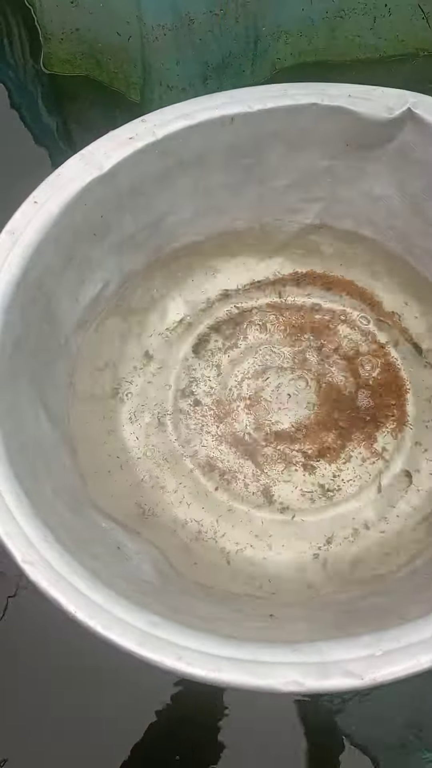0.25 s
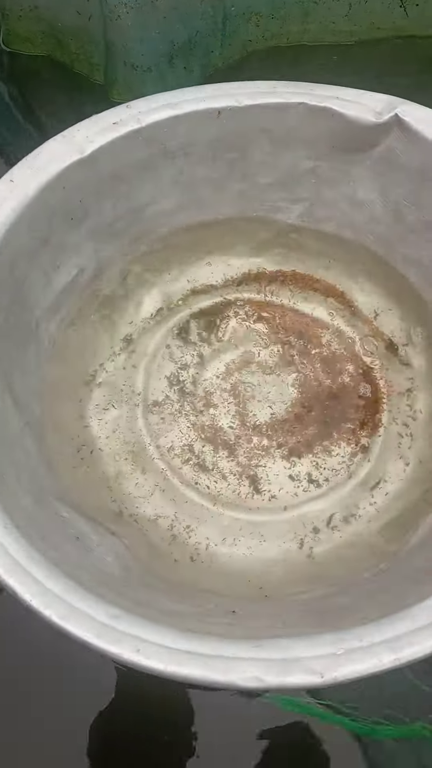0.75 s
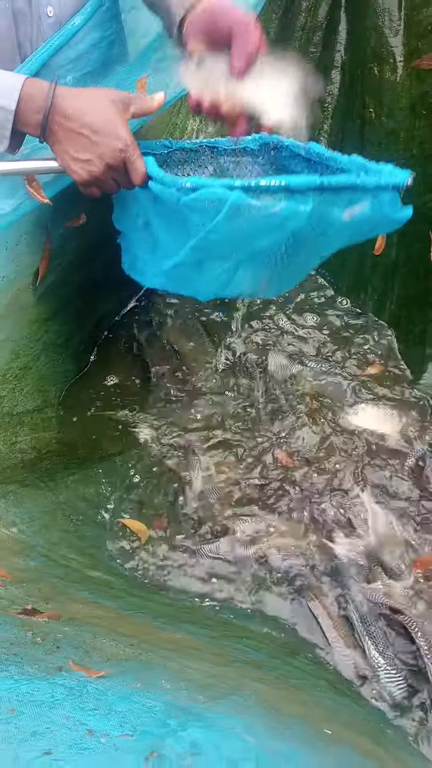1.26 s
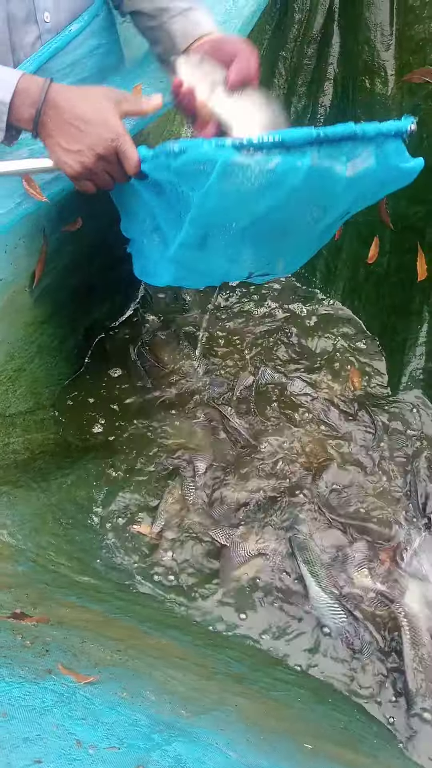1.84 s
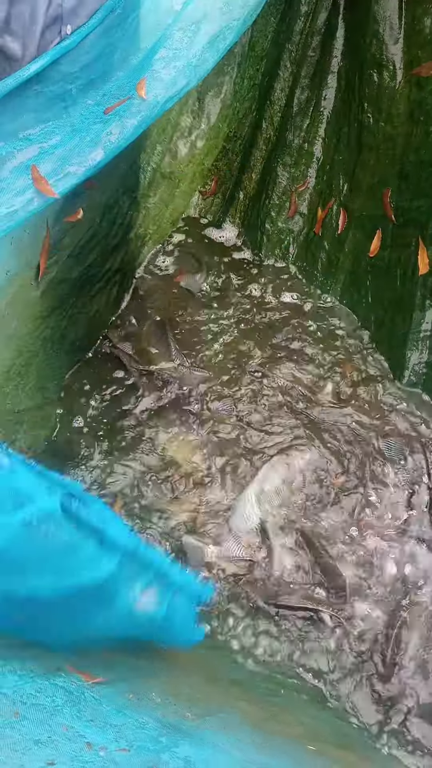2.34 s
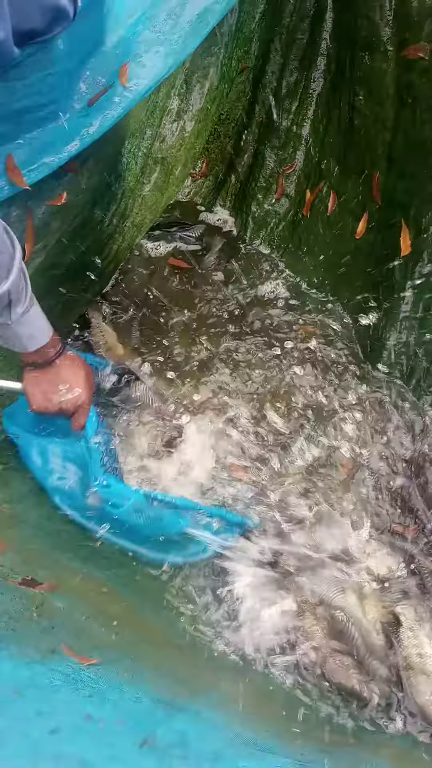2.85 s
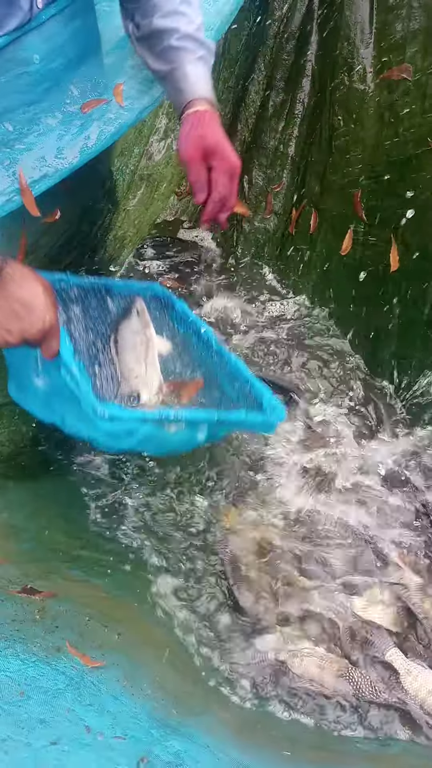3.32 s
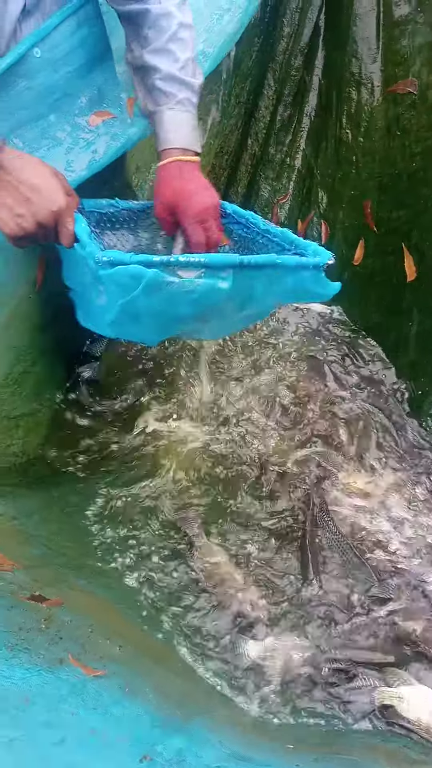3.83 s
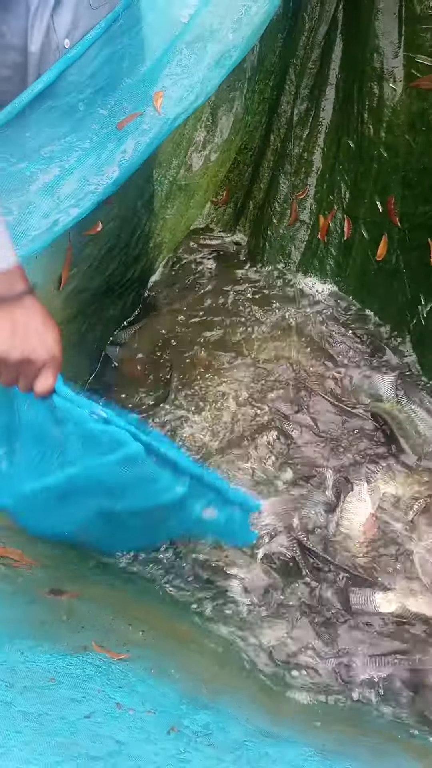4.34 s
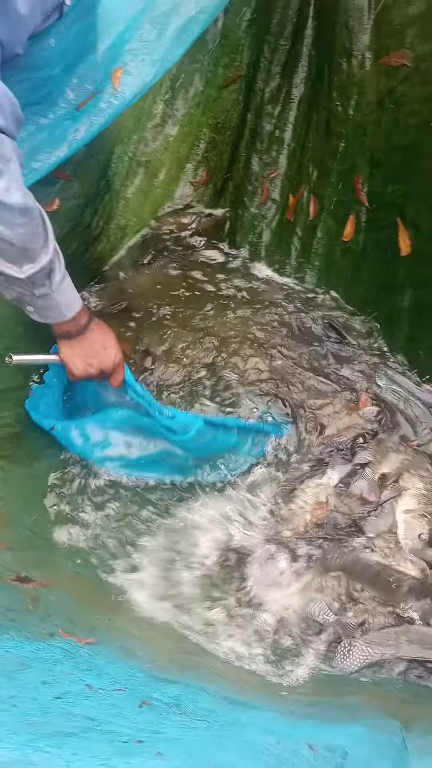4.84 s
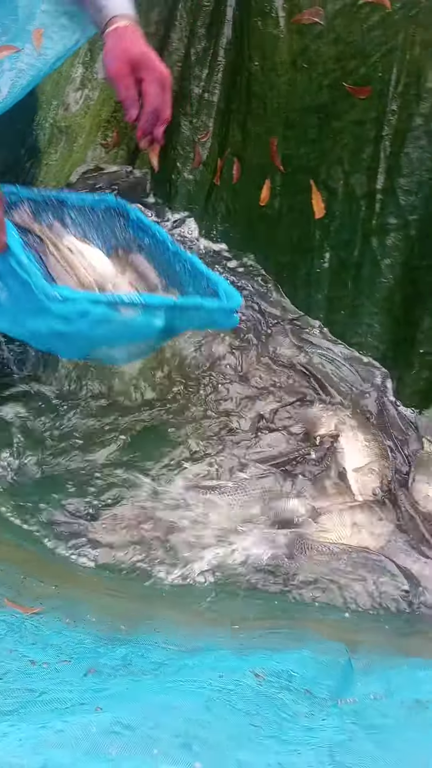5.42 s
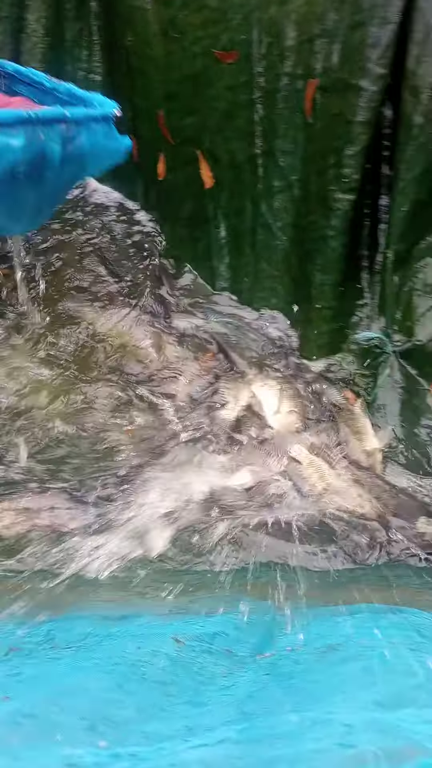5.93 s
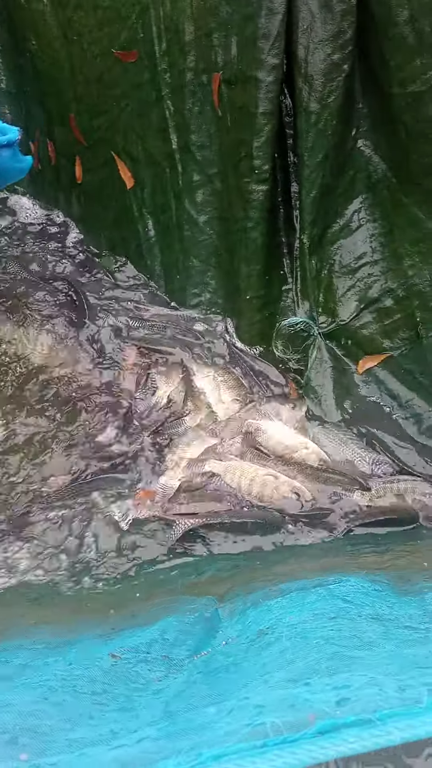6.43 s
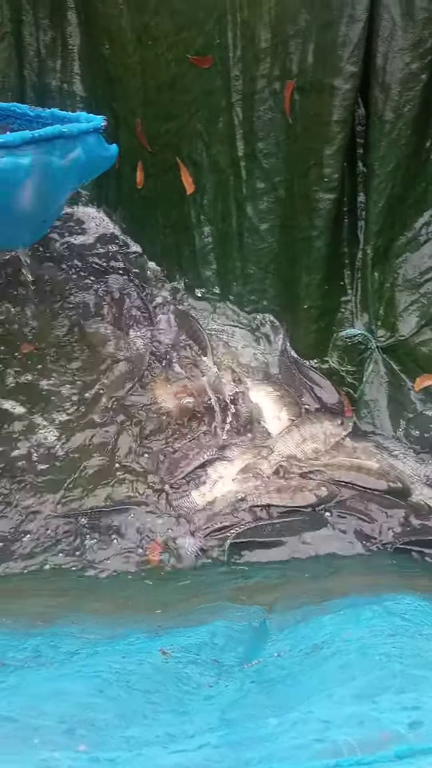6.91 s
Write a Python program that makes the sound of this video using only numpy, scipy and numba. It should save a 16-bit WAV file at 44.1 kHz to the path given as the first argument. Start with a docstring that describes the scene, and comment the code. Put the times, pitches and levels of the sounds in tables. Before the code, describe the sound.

Quiet watery churning with ringing plops and soft thuds swells into loud, bubbling fish thrashing with sharp tail slaps, then eases.

```python
"""Crowded fish thrash in a shallow lined pond while a hand net is swept through them.
It starts with quiet churning, a few ringing plops and soft thuds of bodies on the liner. From about 1.8 s
tails slap the surface, and from 2.6 s swarms of bubbles and droplets ring loudly over a wash of noise.
After the last slap at 6.5 s the churning goes on easing. Bubbles, plops, droplets and thuds are decaying tones;
slaps, spray and wash are shaped noise. A small microphone with little bass and treble listens from above."""
import sys
import numpy as np
from scipy import signal
from scipy.io import wavfile
from numba import njit

SR = 44100
rng = np.random.default_rng(int(sys.argv[2]) if len(sys.argv) > 2 else 0)


def generate_wav(sig):
    """Save sig (samples, or channels by samples) to the path in sys.argv[1] as 16-bit PCM at SR."""
    pcm = np.round(np.clip(np.atleast_2d(sig).T, -1, 1) * 32767).astype(np.int16)
    wavfile.write(sys.argv[1], SR, pcm)


N = 316197   # length in samples, about 7.17 s

# Low heaving of the water. Each row: time in seconds, level in dB.
HEAVING = [(0.0, -74.5), (1.88, -65.5), (1.92, -58), (2.21, -73), (2.35, -53), (2.5, -65), (2.62, -46.5),
           (3.05, -67), (3.33, -50.5), (3.43, -68), (3.67, -61), (3.81, -72.5), (4.55, -73.5),
           (4.59, -60.5), (4.63, -69), (4.83, -55), (5.69, -80), (5.79, -57), (5.91, -66.5), (7.17, -63.5)]
# Tone colour of the heaving. Each row: pitch in Hz, relative level in dB per Hz.
RUMBLE_COLOUR = [(24, -49), (40, -27.5), (81, 0), (124, -7.5), (199, -4.5), (260, -12.5), (340, -30),
                 (570, -120)]
DEEP_HZ, DEEP_SHARE = 107, 0.27   # below this pitch the rumble takes only a share of the heaving's swing

# Steady churning. Each row: time in seconds, splash level in dB, gurgle level in dB, spray level in dB.
# Of gurgle and spray, only the swing against the splash is used, not the average.
CHURNING = [(0.0, -45, -51.5, -64.5), (0.9, -47.5, -51.5, -61), (0.94, -45.5, -48.5, -58.5),
            (1.18, -42, -46, -53.5), (1.6, -42, -45, -55.5), (2.46, -39.5, -46, -52), (2.62, -37, -45, -50),
            (2.81, -33.5, -41.5, -45.5), (3.11, -34.5, -46, -48), (3.57, -33.5, -43, -48),
            (3.771, -36.5, -47.5, -48), (3.99, -38.5, -46.5, -52.5), (4.25, -35.5, -48.5, -51.5),
            (4.489, -35, -46.5, -51.5), (4.89, -33, -41.5, -46), (5.17, -34.5, -45.5, -52.5),
            (5.41, -35.5, -47.5, -52.5), (5.75, -34.5, -46.5, -48), (6.07, -37.5, -43, -52.5),
            (6.35, -40.5, -46.5, -51), (6.8, -41.5, -43.5, -52.5), (7.17, -44.5, -44, -56)]
GURGLE_HZ, SPLASH_HZ, SPRAY_HZ = 685, 1880, 4800   # where each churning level rules
# Bouts of thrashing on top of it. Each row: start in seconds, length in seconds, splash level in dB
# halfway through, share of the lift that the gurgle takes from 0 to 1.
THRASHING_BOUTS = [(0.658, 0.028, -42, 0.7), (0.999, 0.33, -44.5, 0.6), (1.628, 0.055, -43.5, 0.2),
                   (1.845, 0.019, -49.5, 0.3), (1.952, 0.02, -38, 0), (2.603, 0.19, -31, 0.4),
                   (2.818, 0.028, -37, 0.4), (2.961, 0.043, -32.5, 1), (3.348, 0.048, -34.5, 0.99),
                   (4.008, 0.015, -37.5, 0.4), (4.183, 0.022, -42, 0.4), (4.301, 0.049, -29.5, 0.6),
                   (4.391, 0.05, -28.5, 1), (4.465, 0.03, -25.5, 0.4), (4.584, 0.075, -31.5, 0.7),
                   (4.922, 0.025, -31.5, 0.5), (5.457, 0.035, -35.5, 0.4), (5.737, 0.047, -30.5, 0.6),
                   (5.82, 0.027, -32, 0.4), (5.9, 0.068, -31, 0), (6.073, 0.096, -35, 0.8),
                   (6.508, 0.017, -44.5, 0.5), (6.707, 0.022, -49, 0.4), (6.93, 0.086, -42.5, 0.8)]
BOUT_ATTACK_S, BOUT_RELEASE_S = 0.0049, 0.044
BOUT_SAG_DB = 4.5   # fall in level from start to end of a bout
SPRAY_SHARE = 0.86   # share of a bout's lift in the spray
# Tone colour of the water. Each row: pitch in Hz, relative level in dB per Hz.
WATER_COLOUR = [(150, -62), (250, -12.5), (417, 0.5), (592, -6), (770, -2.5), (1140, -3), (1500, -3.5),
                (2870, -6), (3620, -6), (4500, -12.5), (5140, -21), (6550, -15), (7100, -18.5),
                (8400, -13.5)]
# Resonances of the lined pit. Each row: pitch in Hz, width in Hz, lift in dB.
PIT_RESONANCES = [(87.5, 7.6, 2.5), (413, 18, 3), (682, 110, 5.5), (787, 15, 9), (1056, 49, 3.5),
                  (1410, 440, 4), (1406, 70, 0.5)]
PIT_T60_S, PIT_DB = 0.13, -9.5   # scatter from the pit walls: time to decay by 60 dB, and level

# Thuds on the liner. Each row: start in seconds, peak in dB, pitch in Hz.
LINER_THUDS = [(0.212, -50, 95), (0.774, -53, 148), (1.638, -50, 94.2), (1.891, -46, 89),
               (1.958, -49, 89.5), (2.325, -44, 158), (2.579, -40.5, 124), (2.793, -46, 98),
               (3.3, -42, 230), (3.64, -52, 145), (4.411, -50, 190), (4.58, -37, 122), (4.796, -43, 153),
               (5.028, -31, 290), (5.772, -36, 264), (6.034, -48, 155), (6.605, -53, 157)]
# Flicks of fine spray. Each row: start in seconds, approximate peak in dB.
SPRAY_FLICKS = [(0.1565, -45), (1.4605, -33), (1.5943, -44), (1.841, -30), (1.933, -45), (2.2558, -39),
                (2.272, -29), (2.4493, -51), (2.5955, -34), (2.6329, -30), (2.7232, -30), (2.838, -35),
                (2.9357, -30), (2.9796, -31), (3.0065, -24.5), (3.0629, -30), (3.0854, -47), (3.283, -28),
                (3.3837, -42), (3.4341, -42), (3.451, -24), (3.5379, -29), (3.64, -32), (3.7342, -31),
                (3.905, -41), (3.936, -33), (4.0178, -38), (4.1, -35), (4.2368, -35), (4.2991, -31.5),
                (4.3171, -29), (4.376, -29), (4.4189, -29), (4.5052, -28), (4.5825, -31), (4.6565, -28),
                (4.734, -36), (4.8678, -40), (4.9856, -29.5), (5.1596, -34), (5.227, -33), (5.461, -32),
                (5.561, -32), (5.6022, -36), (5.6281, -29), (5.7425, -21.5), (5.88, -33), (6.0362, -35),
                (6.0778, -31), (6.133, -29.5), (6.324, -35), (6.4438, -39), (6.4883, -34), (6.5331, -53),
                (6.654, -36), (6.6897, -43), (6.7261, -37), (6.8138, -34.5), (7.0663, -38), (7.1072, -40)]
# Flat slaps of tails on the surface. Each row: start in seconds, level in dB before SLAP_DB is added,
# fading time in milliseconds.
TAIL_SLAPS = [(1.846, -26, 7.6), (2.598, -51, 3.5), (2.934, -22, 8.7), (3.062, -26, 2), (3.449, -20, 1.2),
              (4.591, -22, 4.1), (5.226, -20, 3.8), (5.775, -16, 4.9), (6.153, -19, 2.1),
              (6.323, -18.5, 3.9), (6.529, -13, 4.2)]
# Small droplets falling back. Each row: start in seconds, peak in dB, pitch in Hz.
FALLING_DROPLETS = [(0.0587, -40, 3320), (0.9621, -35, 3110), (1.044, -35, 2380), (1.142, -29, 2380),
                    (1.841, -30, 3140), (2.597, -27, 2420), (2.6329, -35, 2670), (2.659, -24, 2350),
                    (2.7223, -31, 2520), (2.935, -25, 3250), (3.0126, -25, 3870), (3.019, -22, 3640),
                    (3.4504, -24.5, 3430), (3.602, -28, 3900), (3.659, -44, 3530), (3.783, -27.5, 3460),
                    (3.81, -36, 4000), (3.9047, -29.5, 4600), (3.944, -28.5, 2500), (3.981, -32, 3800),
                    (4.0177, -27, 2480), (4.191, -22.5, 3060), (4.516, -18, 3440), (4.565, -26, 3070),
                    (4.5854, -21, 3440), (4.656, -24, 3640), (4.754, -24, 3770), (4.812, -25.5, 2360),
                    (4.9201, -25.5, 2600), (4.984, -28, 3160), (4.991, -27, 2700), (5.161, -29, 4220),
                    (5.1845, -32, 3480), (5.224, -36, 2650), (5.367, -35, 3340), (5.397, -30, 3600),
                    (5.4543, -26, 2460), (5.629, -28, 2470), (5.7732, -28, 3060), (6.038, -29.5, 2400),
                    (6.106, -36, 3900), (6.142, -30, 2350), (6.1576, -20, 2600), (6.2096, -29, 2400),
                    (6.3251, -32, 4570), (6.53, -27, 4060), (6.619, -36, 2440), (6.694, -33, 2530),
                    (6.7088, -28, 2460), (6.728, -35, 2820)]
# Single plops. Each row: time in seconds one cycle after the start, peak in dB, pitch in Hz,
# cycles to die away by 60 dB (held between 5 and 80 when played).
SINGLE_PLOPS = [(0.148, -39, 794, 90), (0.578, -38.5, 1080, 29), (0.669, -34, 1570, 29),
                (0.927, -42, 1470, 20), (1.009, -34, 407, 19), (1.016, -30, 1380, 20),
                (1.041, -34, 418, 16), (1.069, -36, 423, 31), (1.136, -31, 1290, 30), (1.138, -36, 664, 42),
                (1.153, -33, 1670, 27), (1.215, -34, 688, 51), (1.232, -34.5, 410, 14),
                (1.383, -34.5, 485, 14), (1.417, -31, 1246, 29), (1.506, -35, 1090, 25),
                (1.595, -30.5, 1170, 31), (1.629, -31, 1270, 83), (1.751, -32, 1130, 25),
                (1.838, -28, 1620, 45), (1.964, -30, 1100, 19), (2.027, -40, 700, 28),
                (2.088, -36, 1270, 25), (2.254, -31, 673, 11), (2.333, -30.5, 338, 6.7),
                (2.507, -31.5, 1530, 34), (2.596, -30, 1680, 27), (2.616, -26, 1830, 24),
                (2.64, -28, 850, 28), (2.662, -19.5, 1270, 49), (2.665, -22, 1510, 28),
                (2.675, -21, 2150, 25), (2.687, -22, 1950, 22), (2.709, -22, 1530, 31),
                (2.718, -25, 1720, 22), (2.728, -24, 1500, 18), (2.777, -26, 1520, 18),
                (2.789, -27, 1800, 12), (2.811, -27, 1780, 28), (2.838, -28, 1500, 25),
                (2.849, -25, 1220, 17), (2.866, -24, 1700, 18), (2.912, -35.5, 745, 31),
                (2.971, -27, 1510, 31), (3.007, -25.5, 1300, 39), (3.062, -26.5, 1480, 28),
                (3.211, -29.5, 1340, 19), (3.246, -28.5, 346, 6.6), (3.276, -30, 1390, 14),
                (3.312, -24, 1320, 11), (3.349, -19.5, 1420, 45), (3.383, -23, 1560, 24),
                (3.428, -32.5, 397, 13), (3.478, -30, 1360, 25), (3.526, -29.5, 716, 30),
                (3.595, -29.5, 1970, 30), (3.702, -30, 1260, 29), (3.809, -30, 1390, 20),
                (3.862, -32.5, 1280, 33), (3.89, -29, 1310, 26), (3.936, -29, 1370, 22),
                (4.023, -17.5, 1810, 14), (4.189, -28, 2040, 26), (4.216, -26, 1025, 31),
                (4.274, -35, 830, 45), (4.315, -35, 1870, 15), (4.337, -24.5, 1630, 55),
                (4.397, -25, 1560, 37), (4.414, -26, 1490, 35), (4.43, -32, 1400, 25),
                (4.458, -30, 873, 36), (4.499, -17, 1440, 17), (4.528, -27, 795, 25),
                (4.529, -18.5, 1830, 17), (4.564, -17.5, 1620, 20), (4.589, -16.5, 2360, 21),
                (4.625, -22.5, 1373, 66), (4.76, -27, 1720, 57), (4.787, -27.5, 1610, 40),
                (4.808, -28, 970, 26), (4.889, -32, 1700, 24), (4.917, -25, 1530, 31),
                (4.974, -29.5, 746, 23), (4.988, -25.5, 1550, 28), (5.028, -24, 890, 9.9),
                (5.049, -29.5, 640, 20), (5.049, -32, 420, 16), (5.072, -28, 794, 22),
                (5.074, -26.5, 2000, 25), (5.146, -31, 1610, 24), (5.168, -27.5, 1530, 24),
                (5.224, -23.5, 1720, 20), (5.398, -27.5, 944, 30), (5.462, -24.5, 1820, 37),
                (5.628, -25, 1050, 26), (5.776, -23, 2080, 24), (5.817, -24, 2170, 30),
                (5.846, -23, 1590, 19), (5.88, -30, 1060, 17), (5.902, -24, 910, 20),
                (5.929, -28, 1900, 16), (5.96, -26, 1580, 42), (6.082, -31, 1680, 20),
                (6.088, -26, 1360, 35), (6.112, -29, 2070, 16), (6.124, -26, 2200, 22),
                (6.153, -20, 1920, 26), (6.162, -25, 2120, 23), (6.189, -26, 2170, 21),
                (6.223, -26, 2200, 30), (6.324, -31.5, 753, 41), (6.397, -34.5, 770, 25),
                (6.51, -28.5, 456, 12), (6.52, -31, 1200, 22), (6.529, -32.5, 780, 25),
                (6.531, -32.5, 416, 23), (6.61, -31, 430, 13), (6.698, -37, 743, 36), (6.713, -47, 390, 44),
                (6.75, -35, 810, 30), (6.918, -33, 640, 33), (6.948, -46, 550, 20)]

BUBBLES_DB, WASH_DB, SLAP_DB = -3, -5.5, -8.0   # layer levels
BASS_CUT_HZ, TREBLE_CUT_HZ, CUTOFF_HZ = 58, 7016, 8600   # microphone limits, then the steep top cut
HISS_DB = -102


def from_db(db):
    """Turn decibels into a gain."""
    return 10 ** (np.asarray(db) / 20)


def rms_one(x):
    """Scale a sound so that its average strength (rms) is 1."""
    return x / np.sqrt(np.mean(x ** 2) + 1e-20)


def at_hz(points, hz):
    """Read a tone colour at a pitch, on a log-frequency axis."""
    return np.interp(np.log(hz), np.log(np.array(points)[:, 0]), np.array(points)[:, 1])


def to_samples(s):
    """Turn seconds into whole sample positions."""
    return np.round(s * SR).astype(np.int64)


def noise_band(low_hz, high_hz, order):
    """White noise keeps only the pitches between two limits."""
    band = signal.butter(order, [low_hz, high_hz], "band", fs=SR, output="sos")
    return signal.sosfilt(band, rng.standard_normal(N))


def fading_puffs(start, height, fading_s):
    """Each start jumps to its height and fades exponentially."""
    puffs = np.zeros(N)
    puffs[start] = height
    return signal.lfilter([1], [1, -np.exp(-1 / (fading_s * SR))], puffs)


def drift(rate_hz):
    """Slow random wandering: noise at every 40th sample through two one-pole low-passes; rms 1."""
    r = np.exp(-80 * np.pi * rate_hz / SR)
    coarse = rng.standard_normal(N // 40 + 2002)
    slow = signal.lfilter([1], [1, -2 * r, r * r], coarse)[2000:]   # skip the filter's settling
    return np.interp(np.arange(N) / 40, np.arange(len(slow)), rms_one(slow))


@njit
def ring(start, hz, height, cycles, rise, swell, length, rate):
    """Each tone swells for some cycles, then dies by 60 dB in its cycles; a positive rise lifts its pitch."""
    out = np.zeros(length)
    for k in range(len(start)):
        lasting = int((cycles[k] + swell) * rate / hz[k])
        for i in range(min(lasting, length - start[k])):
            c = i * hz[k] / rate   # cycles since the start
            attack = np.sin(np.pi / 2 * min(c / swell, 1.0)) ** 2
            decay = np.exp(-np.log(1000) * max(c - swell, 0.0) / cycles[k])
            wave = np.sin(2 * np.pi * c * (1 + rise[k] * c / 2))
            out[start[k] + i] += height[k] * attack * decay * wave
    return out


def banded_noise(colour, low_hz, count, gain_at):
    """Quarter-octave bands of noise, each at its colour's level times a gain of its own in time."""
    edges = low_hz * 2 ** (np.arange(count + 1) / 4)
    white = rng.standard_normal((2, N))   # neighbouring bands use different noise
    out = 0
    for k, (low, high) in enumerate(zip(edges, edges[1:])):
        band = signal.sosfilt(signal.butter(2, [low, high], "band", fs=SR, output="sos"), white[k % 2])
        hz = np.sqrt(low * high)
        out = out + from_db(at_hz(colour, hz)) * gain_at(hz) * band
    return out


def hollow(x):
    """The pit lifts the pitches at which it resonates."""
    out = x.copy()
    for hz, width, lift_db in PIT_RESONANCES:
        r = np.exp(-np.pi * width / SR)
        feedback = [1, -2 * r * np.cos(2 * np.pi * hz / SR), r * r]
        peak = signal.lfilter([(1 - r * r) / 2, 0, (r * r - 1) / 2], feedback, x)
        out += (from_db(lift_db) - 1) * peak
    return out


def walls(x):
    """The close, creased walls scatter each single sound into a short diffuse tail."""
    t = np.arange(round(.15 * SR)) / SR
    tail = rng.standard_normal(len(t)) * from_db(-60 * t / PIT_T60_S)
    tail = tail * (t > .002)   # the scatter begins after 2 ms
    return x + from_db(PIT_DB) * signal.fftconvolve(x, tail / np.sqrt(np.sum(tail ** 2)))[:N]


def bouts(t):
    """Thrashing swells quickly, sags while it lasts and lets go: gives its power and the gurgle's share."""
    start, length, level_db, share = np.transpose(THRASHING_BOUTS)[:, :, None]
    since = np.maximum(t - start, 0)
    attack = 1 - np.exp(-since / BOUT_ATTACK_S)
    release = np.exp(-np.maximum(since - length, 0) / BOUT_RELEASE_S)
    sagging = from_db(level_db - BOUT_SAG_DB * (since / length - .5))
    power = (attack * release * sagging) ** 2 + 1e-30
    total = power.sum(axis=0)
    return total, (power * share).sum(axis=0) / total


def churn_db(s, hz):
    """Churning level at a moment and pitch, blended between gurgle, splash and spray; bouts lift the level."""
    t = np.arange(0, N / SR, .002)
    at, *levels = np.transpose(CHURNING)
    calm, gurgle, spray = (np.interp(t, at, level) for level in levels)
    power, gurgle_share = bouts(t)
    lift = 10 * np.log10(1 + power / from_db(calm) ** 2)
    splash = calm + lift
    gurgle = gurgle + gurgle_share * lift - splash
    spray = spray + SPRAY_SHARE * lift - splash
    gurgle_swing, spray_swing = gurgle - np.mean(gurgle), spray - np.mean(spray)
    low = np.clip(np.log(SPLASH_HZ / hz) / np.log(SPLASH_HZ / GURGLE_HZ), 0, 1)
    high = np.clip(np.log(hz / SPLASH_HZ) / np.log(SPRAY_HZ / SPLASH_HZ), 0, 1)
    return np.interp(s, t, splash) + low * np.interp(s, t, gurgle_swing) + high * np.interp(s, t, spray_swing)


def steady_rms(layer, s):
    """Scale a layer so that it sits at the splash level of the churning."""
    return layer / np.sqrt(np.mean((layer / from_db(churn_db(s, SPLASH_HZ))) ** 2))


def rumble(s, lumpy_db):
    """Water heaves against the liner: a lumpy low noise, steadier at the bottom."""
    lumps = from_db(lumpy_db * drift(14))
    low = rms_one(banded_noise(RUMBLE_COLOUR, 39.2, count=11, gain_at=lambda hz: lumps))
    deep = signal.sosfilt(signal.butter(4, DEEP_HZ, "low", fs=SR, output="sos"), low)
    upper = signal.sosfilt(signal.butter(4, DEEP_HZ, "high", fs=SR, output="sos"), low)
    heave_db = np.interp(s, *np.transpose(HEAVING))
    middle_db = heave_db.mean()
    deep_db = middle_db + DEEP_SHARE * (heave_db - middle_db)
    return from_db(heave_db) * upper + from_db(deep_db) * deep


def wash(s, surge, surge_db, patchy_db):
    """Countless tiny drops merge into a hiss that surges together and flickers band by band."""
    def gain_at(hz):
        return from_db(churn_db(s, hz) + surge_db * surge + patchy_db * drift(20.6))
    return banded_noise(WATER_COLOUR, 236.2, count=21, gain_at=gain_at)


def patter(s, surge, level_db, size_db, surge_db, cycles):
    """Thrown drops tick on the taut liner and the surface: clicks of a few cycles, louder in the surges."""
    when, pitch, size = rng.random((2500, 3)).T
    start = (when * N).astype(np.int64)
    hz = 900 * (7000 / 900) ** pitch
    lucky_db = size_db * np.minimum(-np.log(1 - size), 4)   # a few drops are much louder
    drop_db = at_hz(WATER_COLOUR, hz) + churn_db(start / SR, hz) + surge_db * surge[start] + lucky_db
    height = np.sqrt(hz) * from_db(drop_db)
    ticks = ring(start, hz, height, np.full(len(hz), cycles), np.zeros(len(hz)), 0.6, N, SR)
    return from_db(level_db) * steady_rms(ticks, s)


def thuds(cycles):
    """A body pushes the slack liner, which swings a few cycles."""
    s, peak_db, hz = np.transpose(LINER_THUDS)
    no_rise = np.zeros(len(s))
    return ring(to_samples(s), hz, from_db(peak_db), np.full(len(s), cycles), no_rise, 0.55, N, SR)


def flicks(fading_s, low_hz, high_hz):
    """A tail flicks fine spray into the air: a short bright hiss."""
    s, peak_db = np.transpose(SPRAY_FLICKS)
    height = from_db(peak_db) / 2   # the hiss peaks at about twice its rms
    return fading_puffs(to_samples(s), height, fading_s) * rms_one(noise_band(low_hz, high_hz, order=2))


def slaps(level_db, low_hz, high_hz):
    """A flat blow throws a sheet of water: broad noise that starts almost at once and fades fast."""
    hiss = noise_band(low_hz, high_hz, order=4)
    shape = np.zeros(N)
    rise_ms = 1.5
    ms = np.arange(2000) * 1000 / SR
    for s, peak_db, fading_ms in TAIL_SLAPS:
        at = round(s * SR)
        blow = (1 - np.exp(-ms / rise_ms)) * np.exp(-ms / fading_ms)
        shape[at:at + len(ms)] += from_db(peak_db + level_db) * blow
    return shape * rms_one(hiss)


def droplets(cycles):
    """Each droplet traps a tiny bubble that pings."""
    s, peak_db, hz = np.transpose(FALLING_DROPLETS)
    rise = np.full(len(s), .004)
    return ring(to_samples(s), hz, from_db(peak_db), np.full(len(s), cycles), rise, 3.2, N, SR)


def plops(spray_s, spray_db, trail_s, trail_db, scatter):
    """A large bubble rings out, three neighbours in pitch trail it, and a short puff of spray flies off."""
    s, peak_db, hz, cycles = np.transpose(SINGLE_PLOPS)
    start = to_samples(s - 1 / hz)
    cycles = np.clip(cycles, 5, 80)
    out = ring(start, hz, from_db(peak_db), cycles, np.full(len(s), .006), 3.0, N, SR)
    for late, apart in rng.random((len(s), 3, 2)).transpose(1, 2, 0):
        later = start + (late * trail_s * SR).astype(np.int64)
        near_hz = hz * np.exp(scatter * (2 * apart - 1))
        out += ring(later, near_hz, from_db(peak_db + trail_db), cycles, np.full(len(s), .01), 3.1, N, SR)
    fading = fading_puffs(start, from_db(peak_db + spray_db), spray_s)
    return out + fading * rms_one(noise_band(2200, 6500, order=2))


def bubbles(surge, size_db, surge_db, cycles, rise, swell):
    """A dense swarm of bubbles rings at random moments and pitches, louder in the surges."""
    when, pitch, size, life, climb = rng.random((16000, 5)).T
    start = (when * N).astype(np.int64)
    hz = 240 * (7400 / 240) ** pitch
    lucky_db = size_db * np.minimum(-np.log(1 - size), 3)   # a few bubbles are much louder
    bubble_db = at_hz(WATER_COLOUR, hz) + churn_db(start / SR, hz) + surge_db * surge[start] + lucky_db
    height = hz * from_db(bubble_db)
    lasting = cycles * (.5 + life) * (hz / SPLASH_HZ) ** 0.7   # small bubbles ring for more cycles
    return ring(start, hz, height / np.sqrt(lasting), lasting, rise * climb, swell, N, SR)


def scene():
    """Bubbles, wash and patter share one surging; single sounds and the low heaving are added."""
    s = np.arange(N) / SR
    surge = rms_one(drift(12) + 4.8 * drift(40))
    swarm = bubbles(surge, size_db=2.5, surge_db=2.5, cycles=63.0, rise=0.0039, swell=3.7)
    sheet = wash(s, surge, surge_db=1.0, patchy_db=0.5)
    water = from_db(BUBBLES_DB) * steady_rms(hollow(swarm), s)
    water = water + from_db(WASH_DB) * steady_rms(hollow(sheet), s)
    singles = plops(spray_s=0.01, spray_db=-24.0, trail_s=0.011, trail_db=-12.5, scatter=0.268)
    singles = singles + droplets(cycles=40.0)
    singles = singles + slaps(level_db=SLAP_DB, low_hz=500, high_hz=5100)
    singles = singles + flicks(fading_s=0.0036, low_hz=3920, high_hz=8100)
    singles = singles + patter(s, surge, level_db=-15, size_db=3.0, surge_db=2.0, cycles=7.0)
    low = thuds(cycles=12.0) + hollow(rumble(s, lumpy_db=4.5))
    return (water + walls(singles) + low)[None]


def record(dry):
    """The microphone loses deep bass and top treble, the top is cut steeply; a very faint hiss is added."""
    thin = signal.sosfilt(signal.butter(2, BASS_CUT_HZ, "high", fs=SR, output="sos"), dry)
    dull = signal.sosfilt(signal.butter(16, TREBLE_CUT_HZ, fs=SR, output="sos"), thin)
    cut = signal.sosfilt(signal.cheby2(20, 50, CUTOFF_HZ, fs=SR, output="sos"), dull)
    return cut + from_db(HISS_DB) * rng.standard_normal(dry.shape)


dry = scene()
out = record(dry)
generate_wav(out)
```